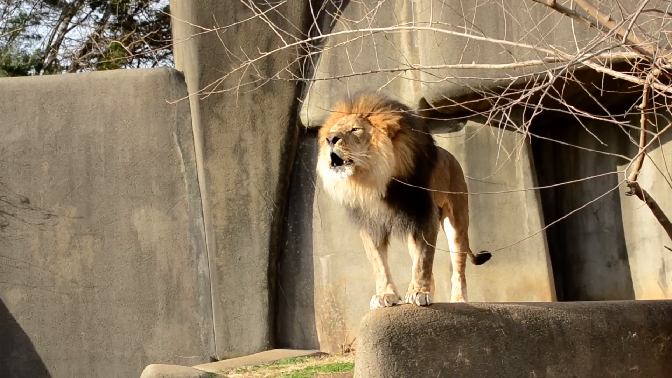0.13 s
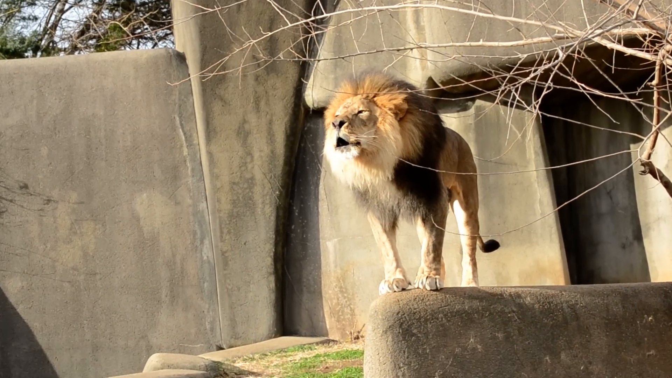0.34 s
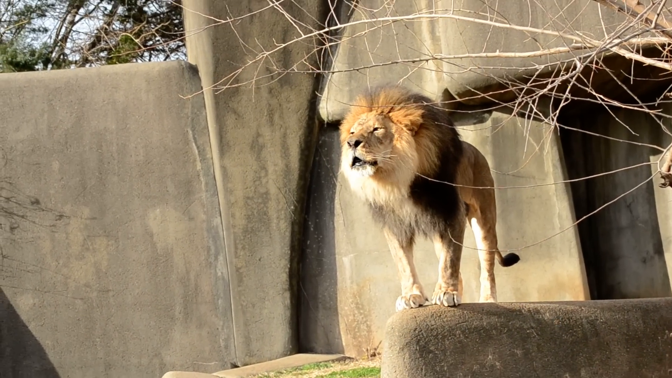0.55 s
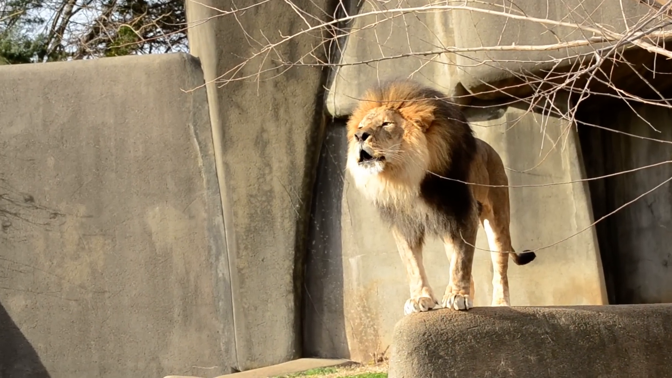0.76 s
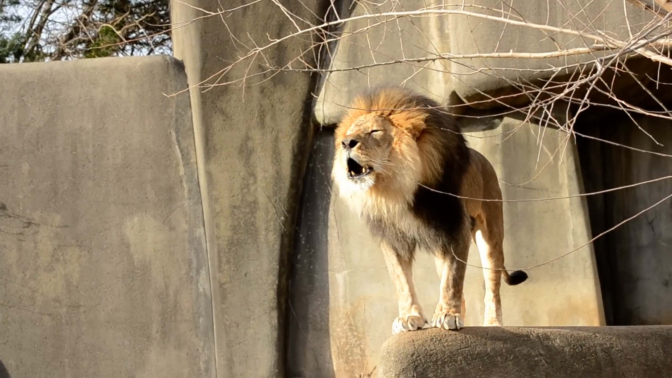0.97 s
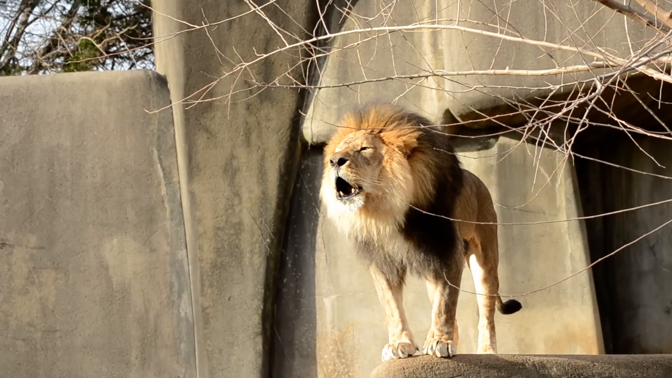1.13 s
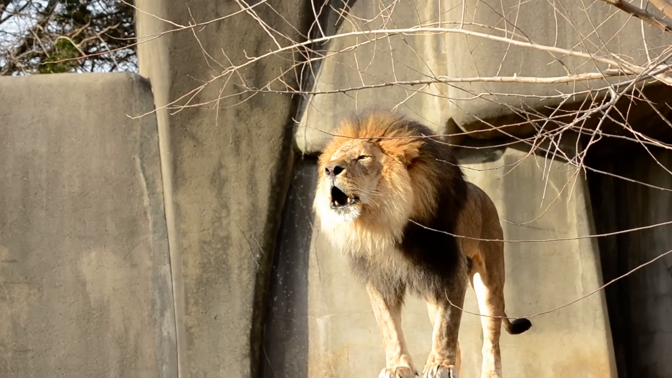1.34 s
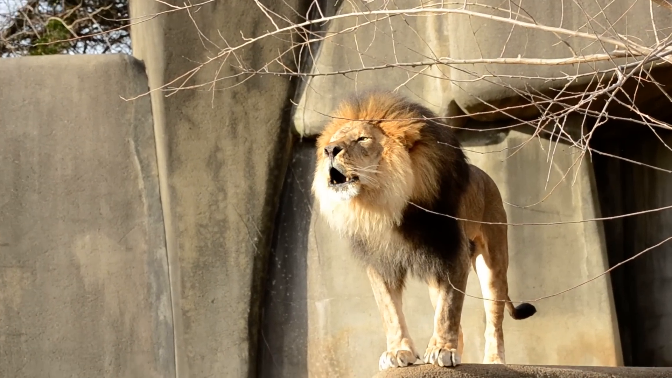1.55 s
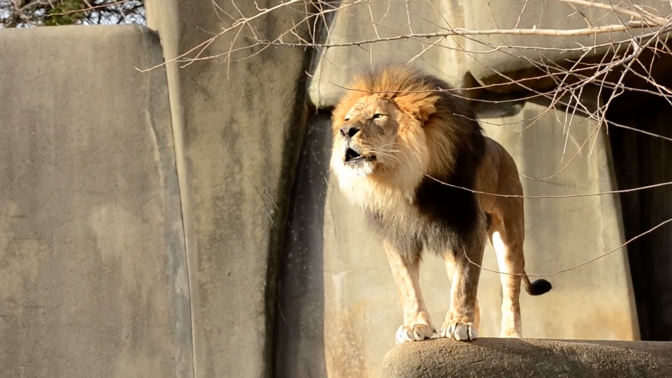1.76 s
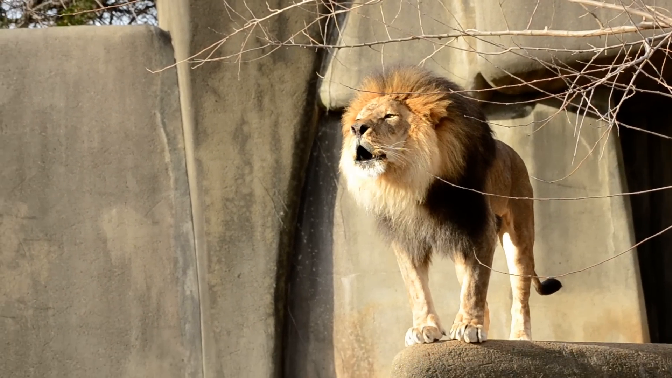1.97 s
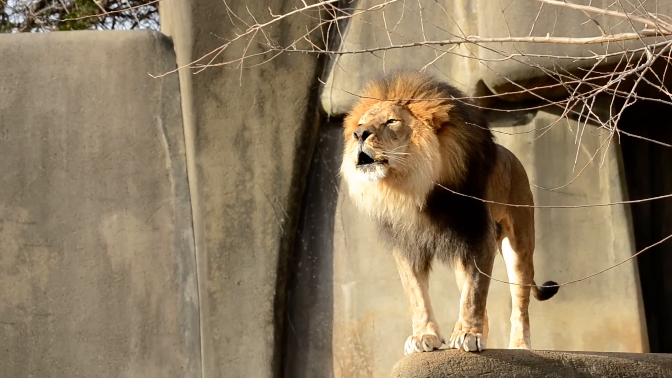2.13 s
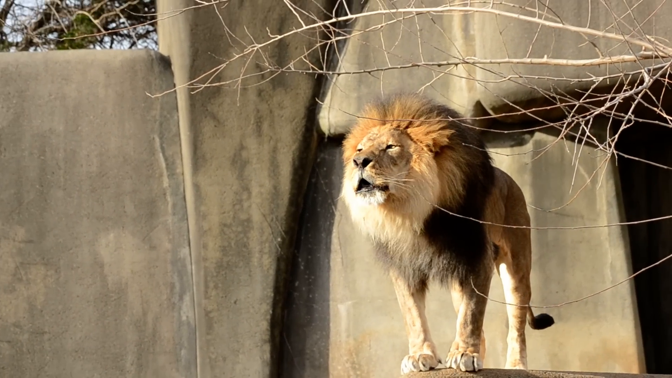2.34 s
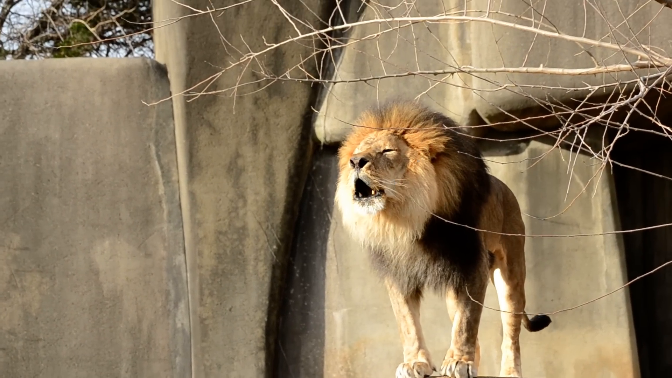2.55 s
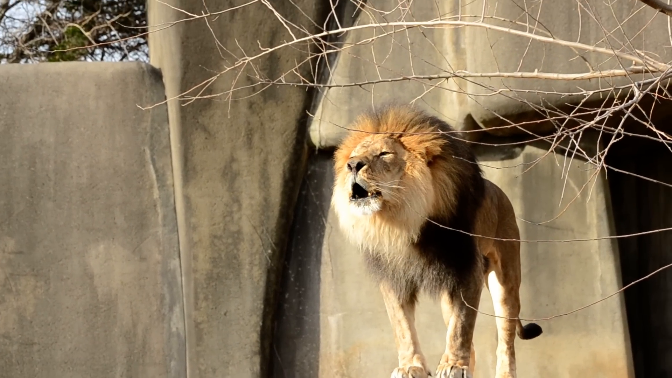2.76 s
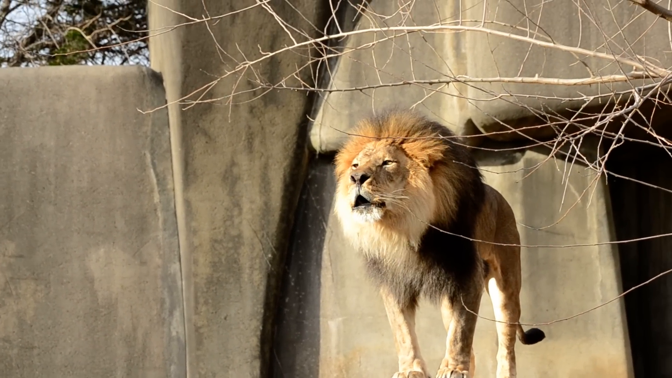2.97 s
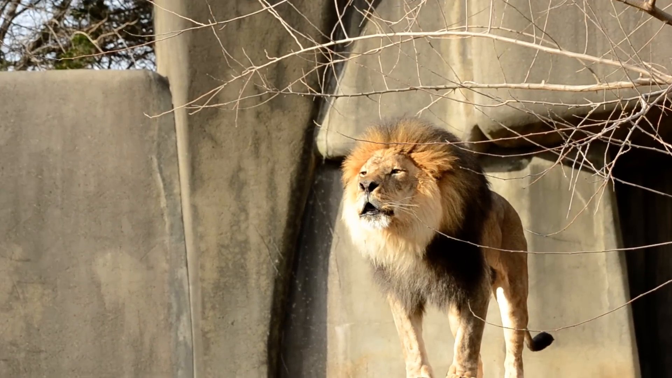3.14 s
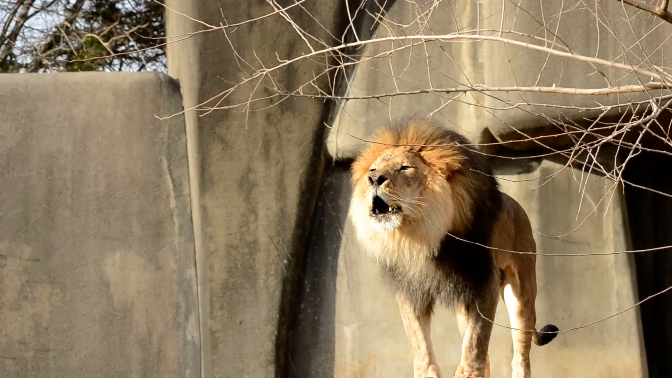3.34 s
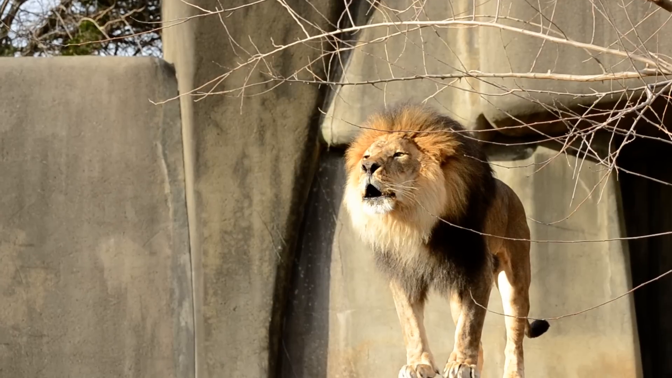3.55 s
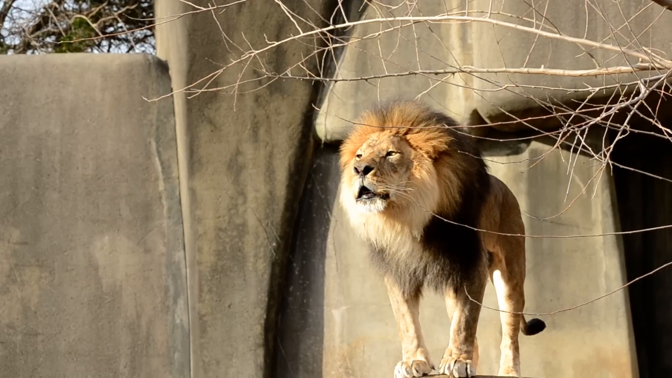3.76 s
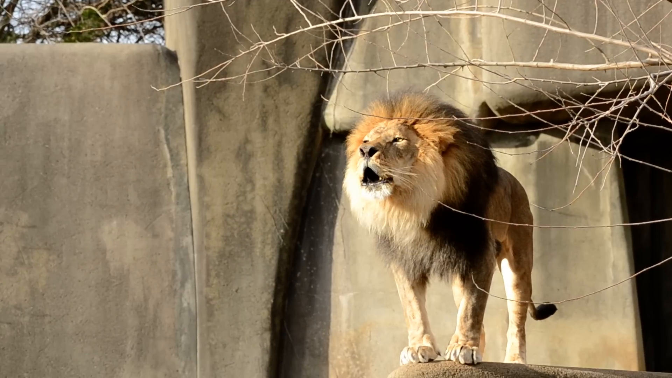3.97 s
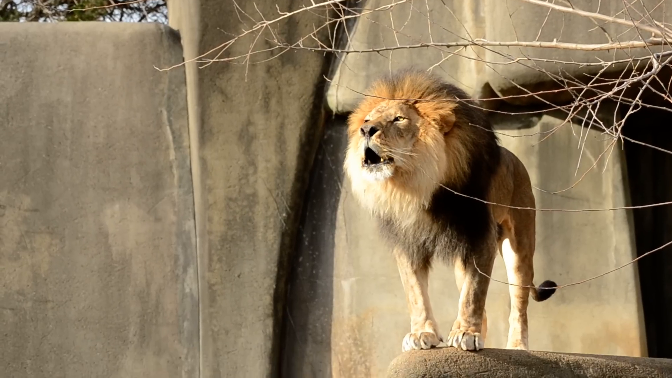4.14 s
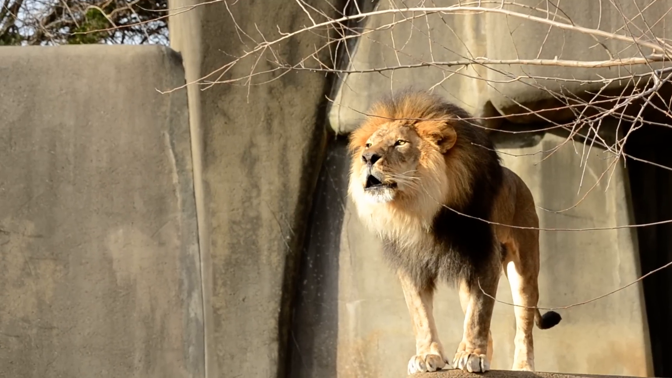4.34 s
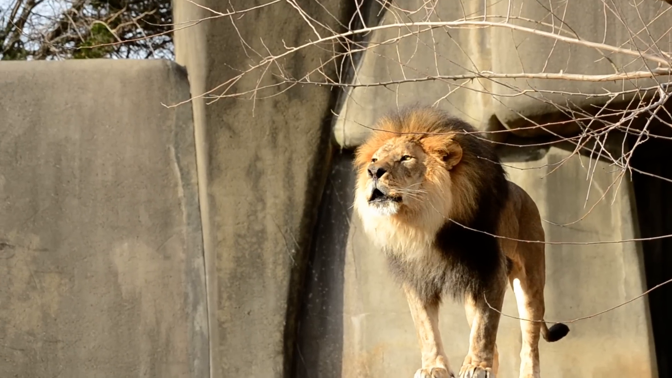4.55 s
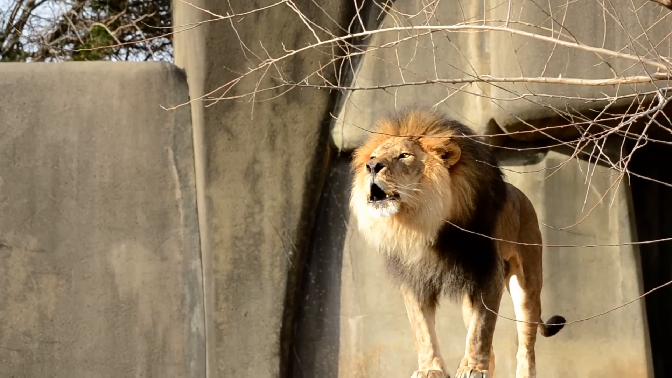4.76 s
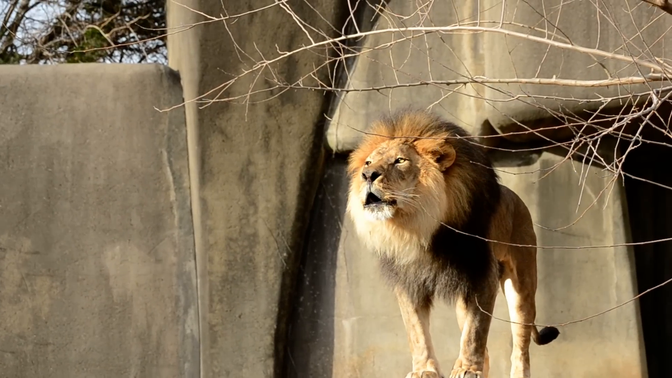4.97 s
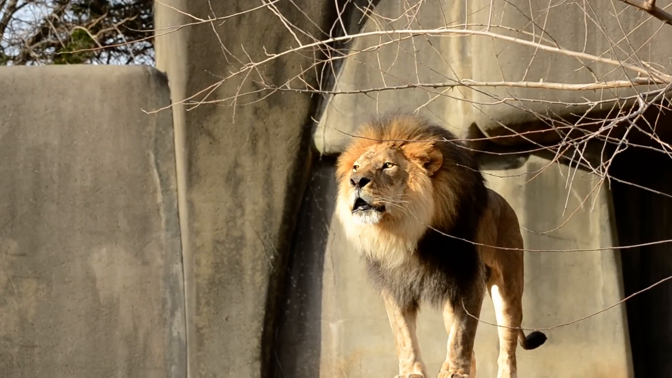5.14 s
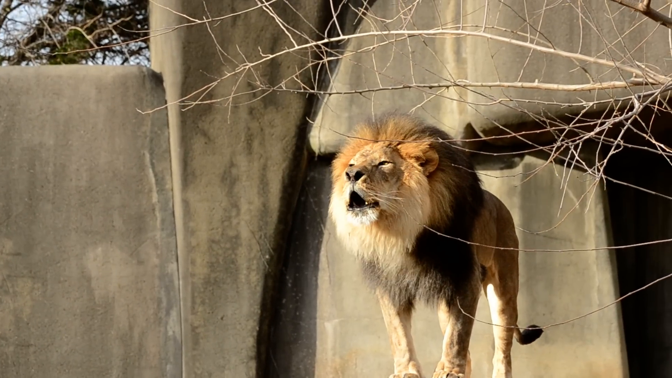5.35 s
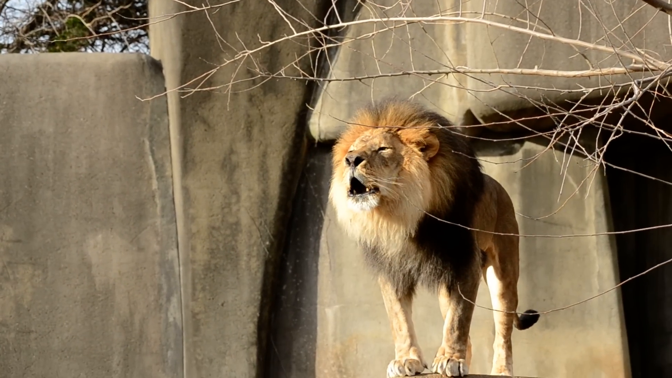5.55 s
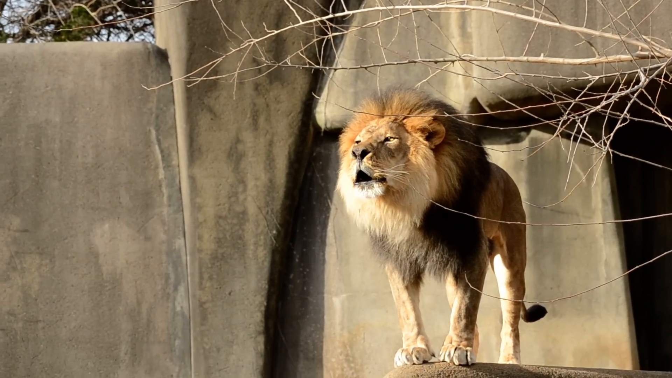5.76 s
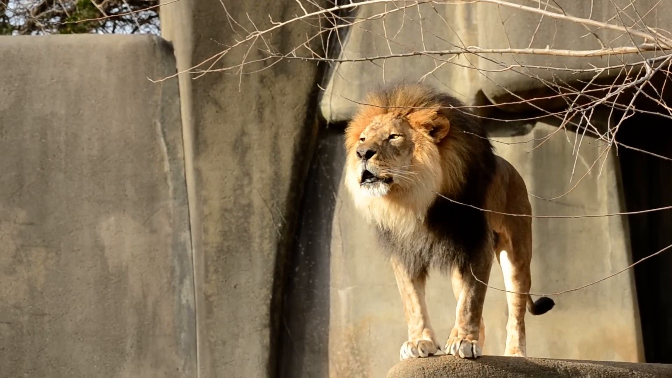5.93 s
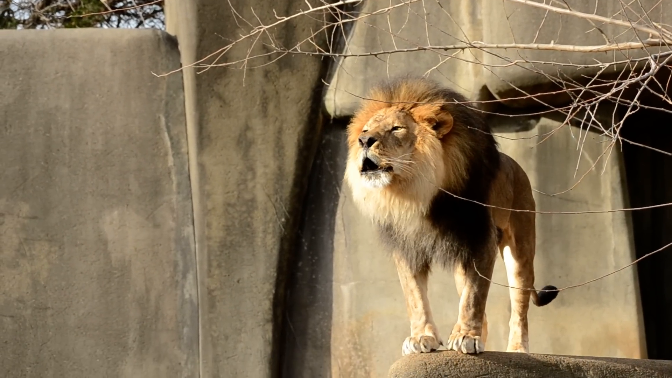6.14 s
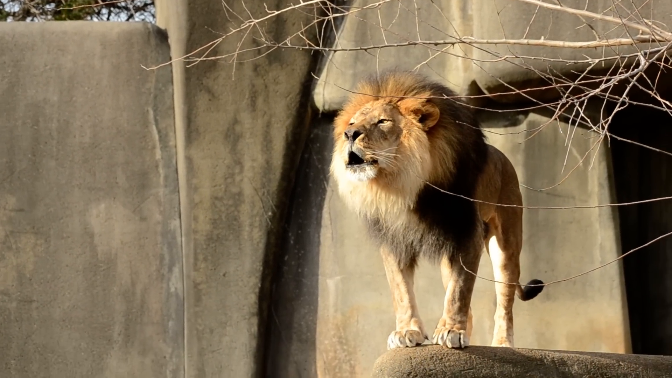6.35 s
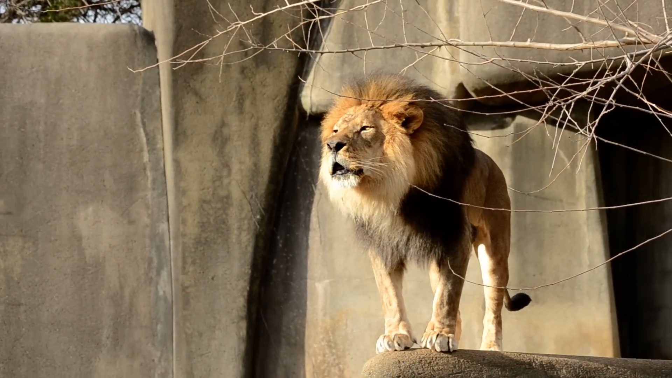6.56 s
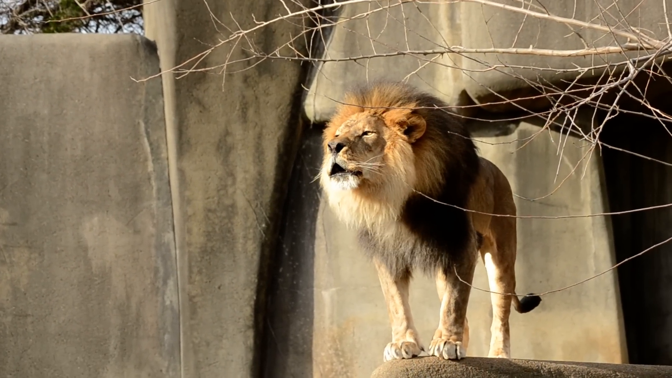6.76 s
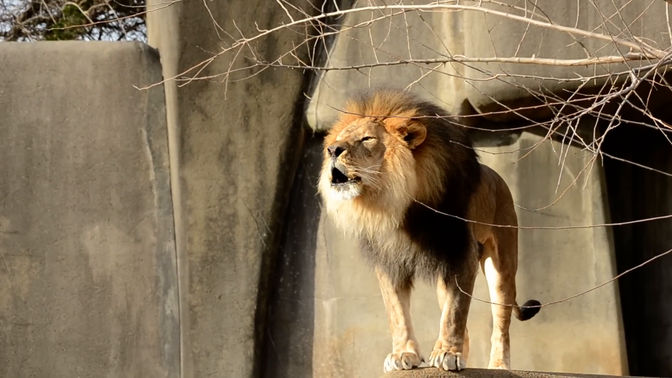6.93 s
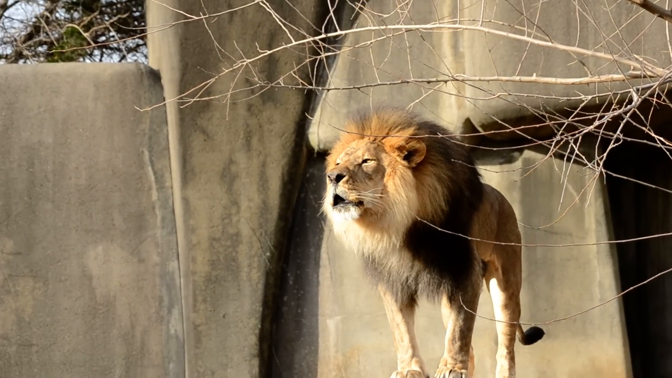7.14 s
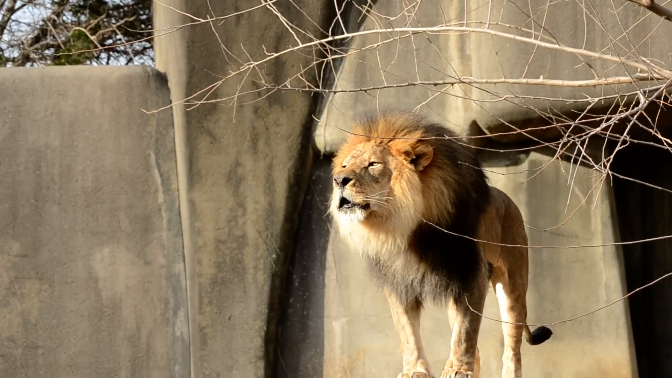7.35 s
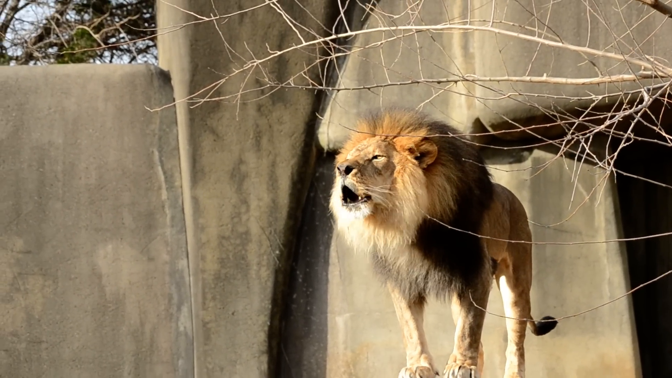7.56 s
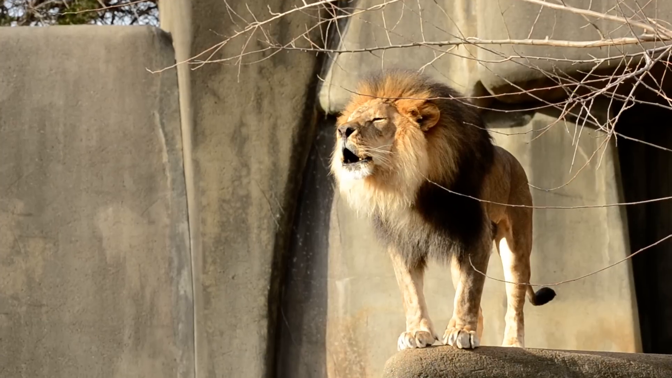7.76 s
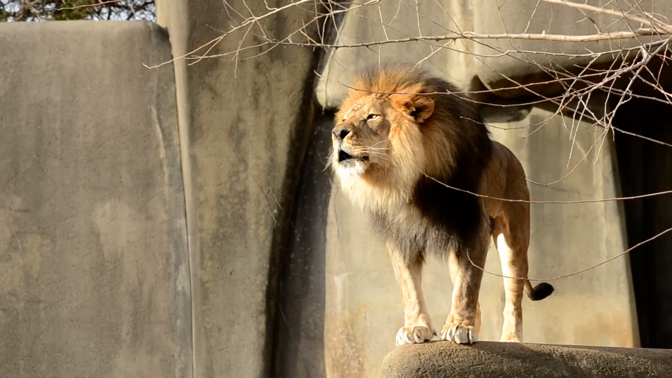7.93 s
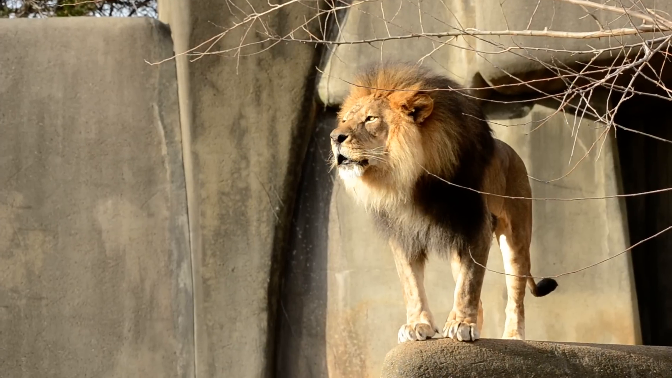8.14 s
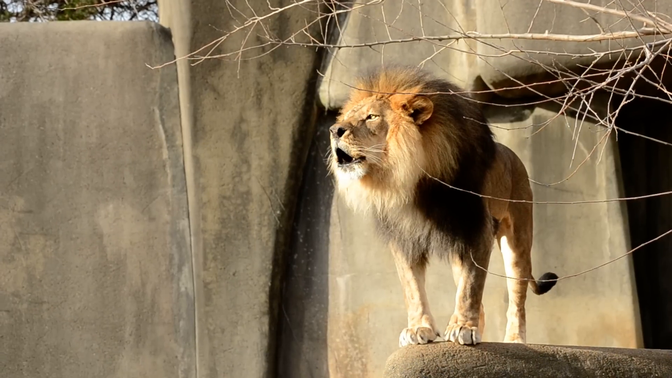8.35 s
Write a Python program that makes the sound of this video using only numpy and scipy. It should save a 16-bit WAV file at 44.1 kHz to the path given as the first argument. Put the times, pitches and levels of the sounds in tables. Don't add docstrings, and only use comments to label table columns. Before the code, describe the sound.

A male lion calls loudly in a concrete enclosure over a soft, steady distant hum. A coarse grunt starts almost at once and stops near 0.3 s. In the gap come a faint rustle, a thin high bird whistle around 0.7 s and small plastic ticks. From 0.9 to 1.7 s one longer roar opens from a growl into a strong, buzzing, hollow tone, then turns raspy as the mouth shuts. A very short weaker grunt follows at 2.0 s with a clear tick, then hoarse, rattling grunts at about 2.6, 3.3, 4.0, 4.7, 5.4, 6.2, 6.9 and 7.6 s, and a last duller one begins near 8.4 s. Each swells fast, ends abruptly and leaves a short wall echo. Close ticks and brief rubs, the longest near 5.9 s, sit by the small mono microphone, with thin bass and softened treble.

```python
import sys
import numpy as np
from scipy import signal
from scipy.fft import irfft
from scipy.io import wavfile
from scipy.ndimage import uniform_filter1d

SR = 44100
rng = np.random.default_rng(int(sys.argv[2]) if len(sys.argv) > 2 else 0)


def to_wav(s):
    ch = np.atleast_2d(s).T
    pcm = np.round(np.clip(ch, -1, 1) * 32767)
    wavfile.write(sys.argv[1], SR, pcm.astype(np.int16))


def gain_from_db(level_db):
    decades = np.asarray(level_db, float) / 20
    return 10 ** decades


N = 374850

# [f at rest/Hz, f wide open/Hz, width/Hz, share that holds a tone/0-1]
THROAT_MODES = [(245, 270, 40, .1), (321, 394, 18, .65), (385, 470, 45, .1), (475, 572, 50, .08),
                (590, 650, 80, 0)]


def evened(x):
    return x / np.sqrt(np.mean(x ** 2) + 1e-20)


def read(points, hz):
    f, value = np.transpose(points)
    return np.interp(np.log(hz + 1), np.log(f + 1), value)


def band(x, low_hz, high_hz):
    return signal.sosfilt(signal.butter(3, [low_hz, high_hz], "band", fs=SR, output="sos"), x)


def decay(x, tau_s):
    return signal.lfilter([1], [1, -np.exp(-1 / (tau_s * SR))], x)


def flutter(size):
    smooth = uniform_filter1d(rng.standard_normal(size), size=900)
    return evened(uniform_filter1d(smooth, size=900))


def add(mix, s, sound):
    part = mix[round(s * SR):][:len(sound)]
    part += sound[:len(part)]


def hum():
    # [f/Hz, level/dB per Hz]
    hum_spectrum = [(15, -73), (25, -52), (98, -1.5), (196, 0), (260, -25), (295, 3), (481, -5.5),
                    (576, -4), (639, -3), (964, -1.5), (2190, -17.5), (2770, -14), (3310, -21),
                    (9760, -39.5), (11700, -52), (15200, -91), (22000, -120)]
    frames, hz = N // 256 + 5, np.fft.rfftfreq(1024, 1 / SR)
    a, b, patches = rng.standard_normal((frames, 513, 3)).T
    patches = uniform_filter1d(patches, size=12, axis=0)
    patches = evened(uniform_filter1d(patches, size=14, axis=1))
    level_db = read(hum_spectrum, hz) - 4 * (hz > 7400)
    z = (a + 1j * b) * gain_from_db(level_db[:, None] + 1.4 * patches)
    return gain_from_db(-42) * evened(signal.istft(z, nperseg=1024, noverlap=768)[1][:N])


def bird():
    # [t/s, f/Hz, level/dB]
    whistle_path = [
        (0.62, 6200, -79),
        (0.656, 6300, -66),
        (0.672, 6900, -75),
        (0.752, 6300, -69),
        (0.79, 6764, -76),
        (0.8, 6293, -82),
    ]
    s, hz, db = np.transpose(whistle_path)
    t = np.arange(s[0], s[-1], 1 / SR)
    whistle = np.sqrt(2) * np.sin(2 * np.pi * np.cumsum(np.interp(t, s, hz)) / SR)
    out = np.zeros(N)
    add(out, s[0], whistle * gain_from_db(np.interp(t, s, db)) * signal.windows.tukey(len(t), .1))
    return out


def rustles():
    # [t/s, length/s, level/dB]
    rubs = [
        (0.583, 0.047, -54.5),
        (1.937, 0.022, -59),
        (3.774, 0.029, -58),
        (5.85, 0.2, -53.5),
        (8.254, 0.15, -62.5),
    ]
    out = np.zeros(N)
    for s, length_s, db in rubs:
        grains = rng.standard_normal(SR // 4)[:round(length_s * SR)]
        uneven = evened(uniform_filter1d(rng.standard_normal(SR // 4), size=150))
        grains = grains * gain_from_db(3.6 * uneven)[:len(grains)]
        add(out, s, gain_from_db(db) * evened(band(grains, 4400, 10000)) * signal.windows.tukey(len(grains), .3))
    crackle = (rng.random(N) < 14 / SR) * np.minimum(rng.exponential(1, N), 2)
    return out + gain_from_db(-34) * band(crackle, 5000, 11000)


def ticks():
    # [t/s, peak/dB, ring f/Hz, sharp edge/dB]
    tick_list = [(0.7208, -36, 2520, -33), (0.8044, -49, 2600, -10), (0.8609, -39, 2530, -35),
                 (2.0388, -24, 2160, -26), (2.373, -29.5, 2550, -26), (2.5524, -46, 2300, -3),
                 (2.585, -33, 2580, -21), (3.6277, -26, 2870, -16), (3.713, -38, 2610, -8.5),
                 (3.9865, -34.5, 2600, -16), (4.591, -45, 2780, -7), (5.2494, -42, 2730, -33),
                 (7.3592, -43, 2830, -26), (7.4859, -34, 2870, -42), (8.3255, -38, 3320, -34),
                 (3.9185, -43, 6170, -34), (6.1853, -59, 6390, -14)]
    out, t = np.zeros(N), np.arange(600) / SR
    for s, db, hz, edge_db in tick_list:
        ring = np.sin(2 * np.pi * hz * t) * gain_from_db(-60 * t / .013)
        snap = band(rng.standard_normal(len(t)) * gain_from_db(-60 * t / 0.011), 5000, 11000)
        knock = band(rng.standard_normal(len(t)) * gain_from_db(-60 * t / 0.022), 1140, 3800)
        add(out, s, gain_from_db(db) * (1.3 * ring + 1.6 * knock + gain_from_db(edge_db + 13) * snap))
    return out


def walls(x):
    # [f/Hz, t60/s]
    wall_t60 = [(100, 0.64), (300, 0.72), (700, 0.53), (1500, 0.64), (4000, 0.38), (9000, 0.37)]
    taps = np.zeros(SR)
    at = np.arange(400, SR - 20, 20)
    at = at + rng.integers(0, 20, len(at))
    taps[at] = rng.choice([-1., 1.], len(at))
    hz, t, z = signal.stft(taps, SR, nperseg=256)
    tail = signal.istft(z * gain_from_db(-60 * t / read(wall_t60, hz)[:, None]), SR, nperseg=256)[1]
    return signal.fftconvolve(x, tail / np.linalg.norm(tail))[:N]


def resonate(x, hz, width):
    turn = np.exp(2j * np.pi * np.cumsum(hz * np.ones(len(x))) / SR)
    r = np.exp(-np.pi * width / SR)
    return 2 * (turn * signal.lfilter([1 - r], [1, -r], x / turn + 1e-18)).real


def sing(hz, level):
    r = np.exp(-np.pi * hz[0] / 70 / SR)
    drift = signal.lfilter([1], [1, -r], rng.standard_normal((len(hz), 2)) @ [1, 1j])
    drift = signal.lfilter([1], [1, -r ** 4], drift)
    drift = drift / abs(drift) ** .8
    return level * evened((drift * np.exp(2j * np.pi * np.cumsum(hz) / SR)).real)


def tract(drive, level, modes, strengths, jaw, lowest_hz=None, wobble=1, colour_db=None):
    out, power = 0, 0
    for k, (mode, (rest_db, open_db)) in enumerate(zip(modes, strengths)):
        rest_hz, open_hz, width, share = mode
        hz = wobble * (rest_hz + jaw * (open_hz - rest_hz))
        if k == 0 and lowest_hz is not None:
            hz = lowest_hz
        extra_db = 0 if colour_db is None else colour_db[k]
        gain = gain_from_db(rest_db + jaw * (open_db - rest_db) + extra_db)
        spread = np.sqrt(np.pi * width / SR)
        rung = resonate(drive, hz, width)
        sung = np.sqrt(share) * spread * sing(hz, level) if share else 0
        out = out + (-1) ** k * gain * (rung + sung)
        power = power + (gain * spread) ** 2
    return out / np.sqrt(power)


def slaps(rate, uneven, spread_db, size):
    wander = evened(uniform_filter1d(rng.standard_normal(size), size=300))
    turns = np.floor(np.cumsum(rate * np.exp(uneven * wander)) / SR)
    strength = gain_from_db(spread_db * rng.standard_normal(size))
    clicks = np.diff(turns, prepend=0) * strength
    return clicks / np.sqrt(uniform_filter1d(clicks ** 2, size=4000) + 1e-9)


def folds(jaw):
    size = len(jaw)
    rest_hz, open_hz = THROAT_MODES[1][:2]
    loose = slaps(100, .5, 2.8, size)
    growl = .35 * (1 - jaw) * slaps(40, .25, 2.5, size)
    buzz = .7 * jaw * slaps((rest_hz + jaw * (open_hz - rest_hz)) / 2, .03, 1.5, size)
    return loose * (1 - .5 * jaw) + growl + buzz, growl


def puffed_air(loose):
    gate = decay(abs(loose), 0.0097)
    return evened((.5 + evened(gate)) * rng.standard_normal(len(loose)))


def hard_slaps(t):
    # [t/s, peak/dB]
    slap_list = [(0.095, -7), (0.188, -4), (0.241, -2.5), (0.315, -9), (0.931, -13.5), (1.446, -5.5),
                 (1.521, -7), (1.64, -23.5), (2.058, -13), (2.64, -5.5), (2.897, -4.5), (3.368, -25),
                 (3.431, -3.5), (4.068, -18), (4.309, -12.5), (4.753, -15.5), (4.778, -8.5), (4.949, -12),
                 (5.45, -17), (5.475, -8.5), (5.55, -5), (5.729, -10), (6.253, -11), (6.278, -7.5),
                 (6.304, -7), (6.891, -12), (7.014, -4), (7.083, -14), (7.637, -10.5), (7.668, -6)]
    hard = np.zeros(len(t))
    for at, db in slap_list:
        if t[0] < at < t[-1]:
            hard[round((at - t[0]) * SR)] = gain_from_db(db + 14.5)
    return hard, decay(hard, 0.006) * rng.standard_normal(len(t))


def jolts(growl):
    throb = decay(growl, .013)
    throb = evened(throb - uniform_filter1d(throb, size=3000))
    return 1 + .25 * throb.clip(-2, 4) / 2


def chest(level, rough, hard, taut, jaw, closing):
    # [f at rest/Hz, f wide open/Hz, width/Hz, share that holds a tone/0-1]
    chest_modes = [(138, 167, 14, .85), (186, 226, 30, .1)]
    # [level at rest/dB, level wide open/dB]
    chest_strengths = [(-6, -2.5), (-7, -14)]
    rest_hz, open_hz = chest_modes[0][:2]
    lowest_hz = (.98 * rest_hz + jaw * (open_hz - rest_hz)) * (1 + 0.047 * closing)
    drive = .45 * (1 - .6 * jaw) * level * rough + .1 * hard
    return tract(drive, level * (.4 + taut / 2 + .3 * jaw), chest_modes, chest_strengths, jaw, lowest_hz)


def throat(level, rough, hard, taut, jaw, wobble):
    # [level at rest/dB, level wide open/dB]
    throat_strengths = [(-12, -20.5), (-3, -5), (-11, -17), (-11.5, -16.5), (-17.5, -37)]
    drive = .55 * (1 - .25 * jaw) * level * rough + .3 * hard
    sung_level = level * (.7 + taut / 4 + .15 * jaw)
    return tract(drive, sung_level, THROAT_MODES, throat_strengths, jaw, wobble=np.sqrt(wobble))


def mouth(level, rough, hard, burst, taut, jaw, closing, wobble):
    # [f at rest/Hz, f wide open/Hz, width/Hz, share that holds a tone/0-1]
    mouth_modes = [(711, 790, 26, .65), (850, 988, 30, .55), (1075, 1170, 70, .15), (1235, 1330, 70, .2)]
    # [level at rest/dB, level wide open/dB]
    mouth_strengths = [(2.5, -2.5), (-1, -1.5), (-8, -7.5), (-10, -13.5)]
    rest_hz, open_hz = mouth_modes[0][:2]
    lowest_hz = wobble * (.97 * rest_hz + np.sqrt(jaw) * (open_hz - rest_hz)) * (1 + 0.0693 * closing ** 2)
    drive = .65 * level * rough + 1.2 * hard + .03 * burst
    sung_level = level * taut * (1 - .3 * jaw)
    return tract(drive, sung_level, mouth_modes, mouth_strengths, jaw, lowest_hz, wobble)


def rasp(level, loose, puffs, hard, burst, jaw, closing, wobble):
    # [f at rest/Hz, f wide open/Hz, width/Hz, share that holds a tone/0-1]
    rasp_modes = [(1520, 1480, 200, 0), (1765, 1740, 100, 0), (2070, 2190, 100, 0), (2750, 2660, 320, 0),
                  (3280, 3820, 320, 0), (4420, 4350, 320, 0), (5300, 5150, 300, 0), (6100, 5900, 600, 0),
                  (7050, 6900, 500, 0), (8900, 8800, 1400, 0)]
    # [level at rest/dB, level wide open/dB]
    rasp_strengths = [(-7, -25), (1.5, -2.5), (2.5, 2), (-2, -7), (-1.5, -7), (-3, -11.5), (-11, -13),
                      (-17.5, -19.5), (-18.5, -21.5), (-18.5, -22)]
    late_db = [-1.5, -4, -3, 1.5, 0.8, -2, 0, -0.5, -1.5, -1.5]
    colour_db = [db * closing + 2.2 * flutter(len(jaw)) for db in late_db]
    drive = level * (0.57 * loose + 0.9 * puffs) + 0.14 * hard + 0.015 * burst
    return tract(drive, 0, rasp_modes, rasp_strengths, jaw, wobble=wobble, colour_db=colour_db)


def part_levels(t, strongest, shut, effort_db, jaw):
    # [level re effort/dB, gain jaw open/dB, climb/dB, sag/dB per s, flutter/dB, attack/s]
    mouth_law = (-0.56, -5, 7.5, 106.5, .5, 0.07)
    chest_law = (-7.5, 4, 1, 65, 1.2, 0.08)
    throat_law = (-5.5, 0.3, 5.5, 31, 1.2, 0.05)
    rasp_law = (-14, -3.5, 4.5, 32.5, .6, 0.0467)
    since_s = t - t[0]
    climb = np.clip(1 - since_s / min(strongest - t[0], 0.12), 0, 1)
    shared_db = effort_db - 321 * np.maximum(t - shut, 0)
    levels_db = []
    for db, open_db, climb_db, sag_db, flutter_db, attack_s in (mouth_law, chest_law, throat_law, rasp_law):
        part_db = shared_db + db + open_db * jaw - climb_db * climb
        part_db = part_db - sag_db * np.maximum(t - strongest, 0)
        part_db = part_db + flutter_db * (1 + 1.3 * jaw) * flutter(len(t))
        levels_db.append(part_db - 22 * np.clip(1 - since_s / attack_s, 0, 1) ** 1.57)
    return levels_db


def call(start, strongest, shut, effort_db, share_db, size):
    # [t/s, opening/0-1]
    jaw_path = [
        (.87, 0),
        (.95, .3),
        (1.05, .7),
        (1.1, .95),
        (1.3, 1.0),
        (1.42, .9),
        (1.5, .45),
        (1.62, 0),
    ]
    t = start + np.arange(size) / SR
    jaw = np.interp(t, *np.transpose(jaw_path), left=0, right=0)
    closing = np.clip((t - strongest) / (shut - strongest), 0, 1)
    mouth_db, chest_db, throat_db, rasp_db = part_levels(t, strongest, shut, effort_db, jaw)
    edge = np.clip(np.minimum(t - start, t[-1] - t) / 0.0042, 0, 1)
    in_chest, in_throat, in_mouth, in_rasp = edge * gain_from_db([chest_db, throat_db, mouth_db + share_db, rasp_db])

    loose, growl = folds(jaw)
    puffs = puffed_air(loose)
    hard, burst = hard_slaps(t)
    throb = jolts(growl)
    wobble = 1 + (.022 - .012 * jaw) * evened(uniform_filter1d(rng.standard_normal(size), size=3000))
    taut = np.clip((mouth_db + 36) / 12, .3, 1) * (1 - .7 * closing)
    rough = (.65 * loose + .75 * puffs) * (1.6 - .6 * taut)

    from_chest = chest(in_chest, rough, hard, taut, jaw, closing)
    from_throat = throat(in_throat, rough, hard, taut, jaw, wobble)
    from_mouth = mouth(in_mouth * throb, rough, hard, burst, taut, jaw, closing, wobble)
    from_rasp = rasp(in_rasp * throb, loose, puffs, hard, burst, jaw, closing, wobble)
    thud = gain_from_db(effort_db - 37.5) * np.exp(-((t - shut + 0.023) / 0.041) ** 2)
    rumble = 22 * band(puffs * thud, 32, 80)
    low = band(from_chest, 99, 236) - band(from_throat, 190, 725)
    return rumble + low + band(from_mouth, 548, 1650) + band(from_rasp, 750, 14000)


def lion():
    # [start/s, strongest/s, mouth shuts/s, effort/dB, mouth share/dB]
    roar = (0.885, 1.55, 1.665, -17, -2.5)
    grunts = [(0.05, 0.195, 0.33, -16.5, 0.7), (2.03, 2.113, 2.143, -18, -1.6),
              (2.58, 2.722, 2.93, -16.5, 2), (3.335, 3.469, 3.614, -16, 0.9), (4.04, 4.17, 4.357, -17, 0.4),
              (4.715, 4.84, 4.935, -17, -0.2), (5.405, 5.6, 5.78, -16.5, -0.2),
              (6.215, 6.34, 6.45, -18, -0.4), (6.86, 7.01, 7.09, -17, -4.5), (7.59, 7.718, 7.88, -17, 0),
              (8.374, 8.515, 8.88, -18, -6.5)]
    out = np.zeros(N)
    add(out, roar[0], call(*roar, size=SR))
    for row in grunts:
        add(out, row[0], call(*row, size=SR // 2))
    return out


def scene():
    voice = lion()
    return (voice + gain_from_db(-7.5) * walls(voice) + ticks() + rustles() + bird())[None]


def top_cut(x):
    return signal.sosfilt(signal.butter(12, 11830, fs=SR, output="sos"), x)


def record(dry):
    # [f/Hz, level/dB]
    mic_response = [(40, -44), (90, 12.5), (130, 0.5), (7400, -0.5), (8000, -5.5), (8600, -4), (10000, -6),
                    (11000, -10), (12500, -58)]
    hz = np.fft.rfftfreq(1024, 1 / SR)
    colour = np.roll(irfft(gain_from_db(read(mic_response, hz))), 512) * np.hanning(1024)
    heard = signal.oaconvolve(dry[0], colour, "same") + band(hum(), 55, 14000)
    heard = .9 * np.tanh(heard / .9)
    return top_cut(heard[None])


dry = scene()
out = record(dry)
to_wav(out)
```